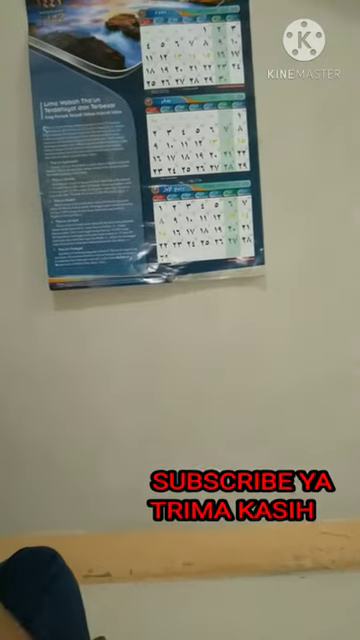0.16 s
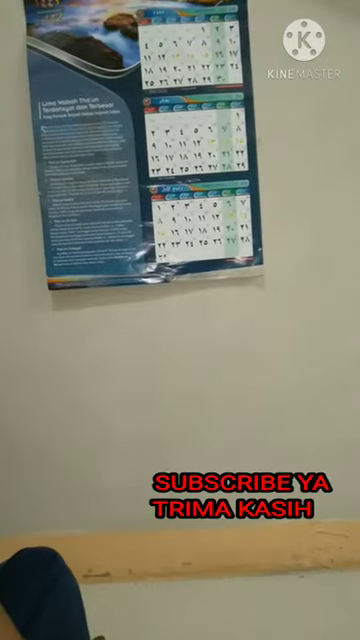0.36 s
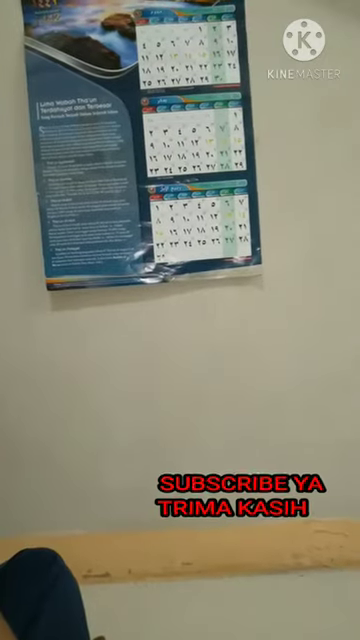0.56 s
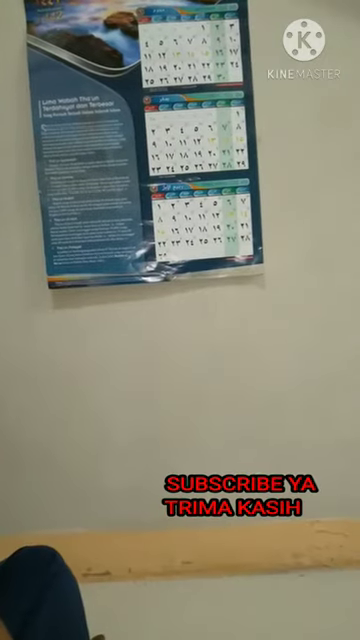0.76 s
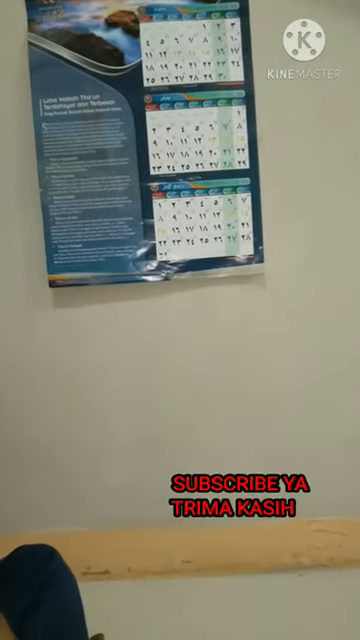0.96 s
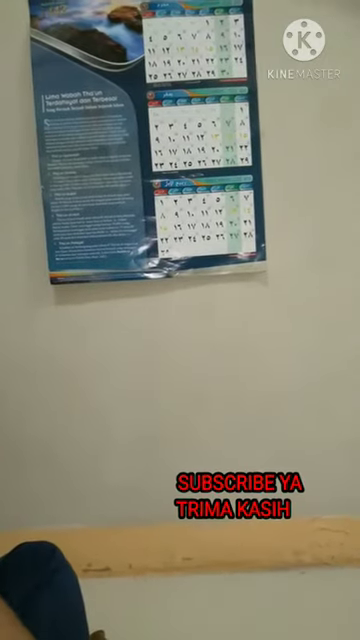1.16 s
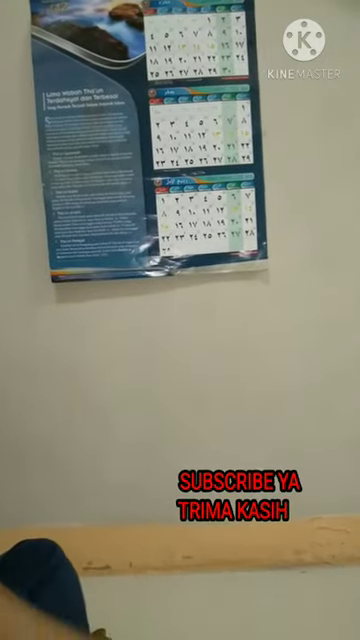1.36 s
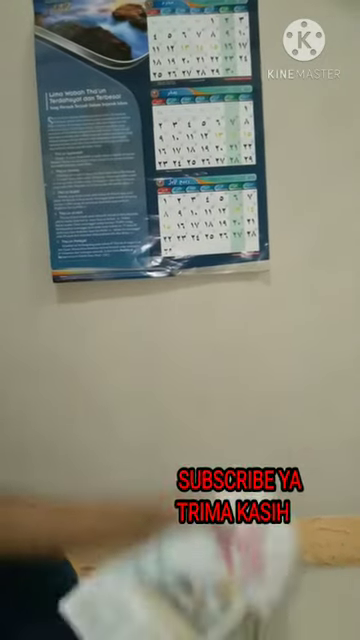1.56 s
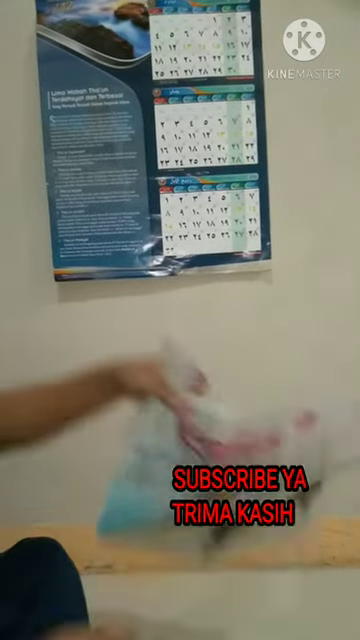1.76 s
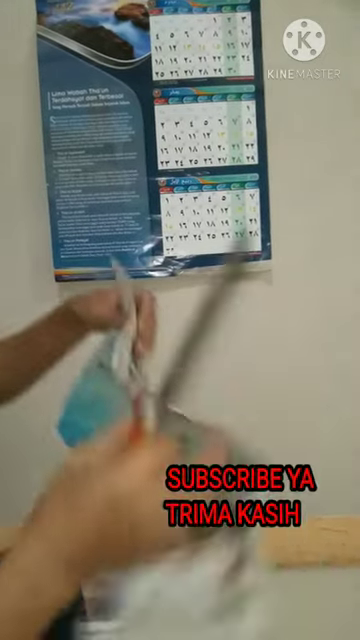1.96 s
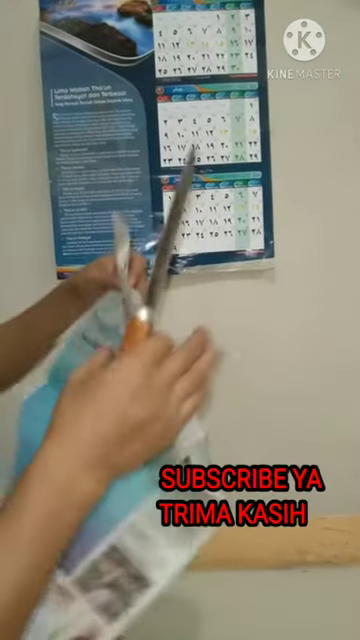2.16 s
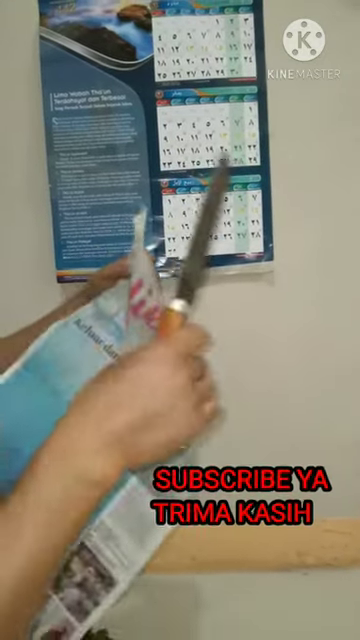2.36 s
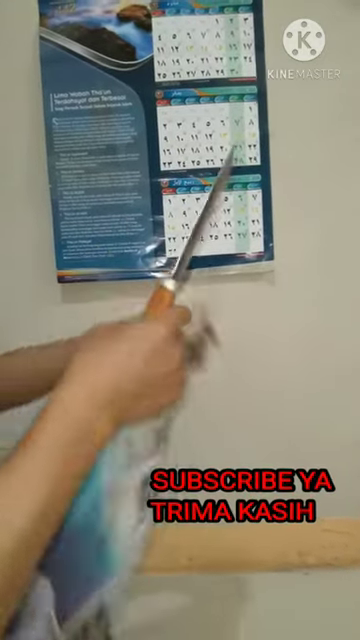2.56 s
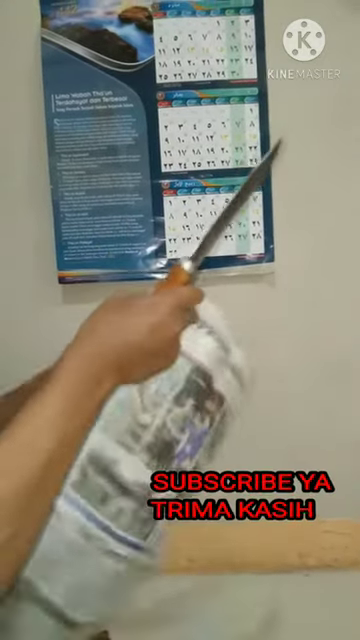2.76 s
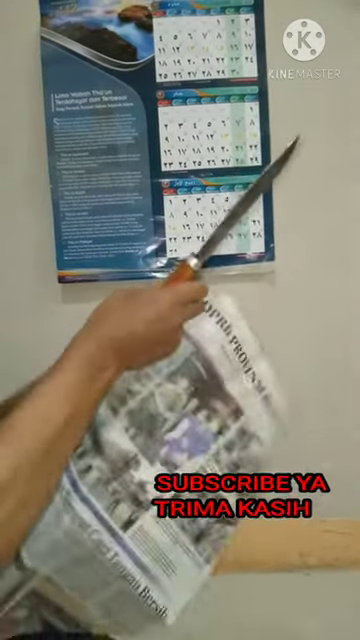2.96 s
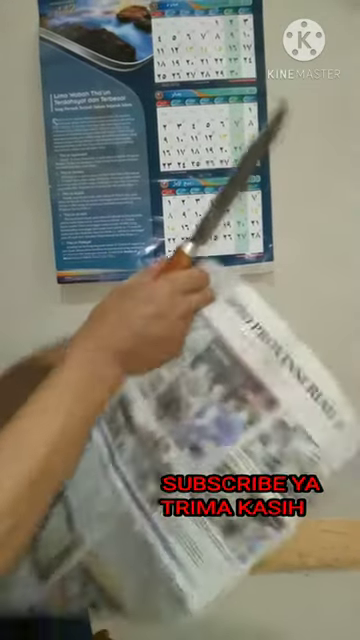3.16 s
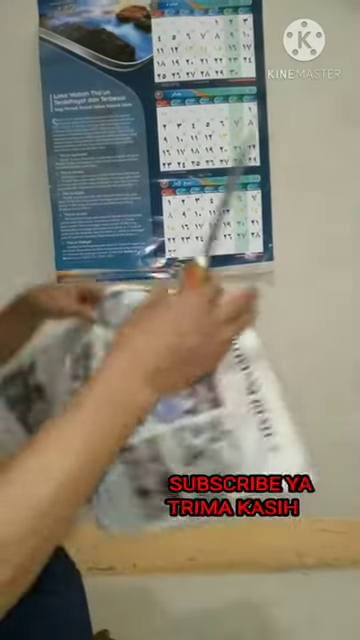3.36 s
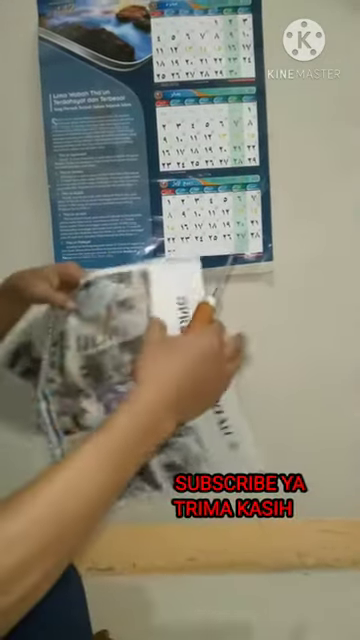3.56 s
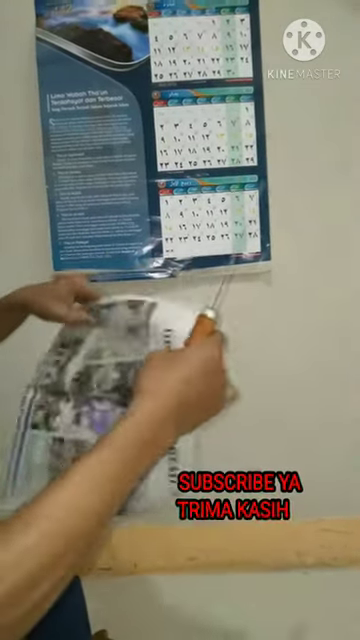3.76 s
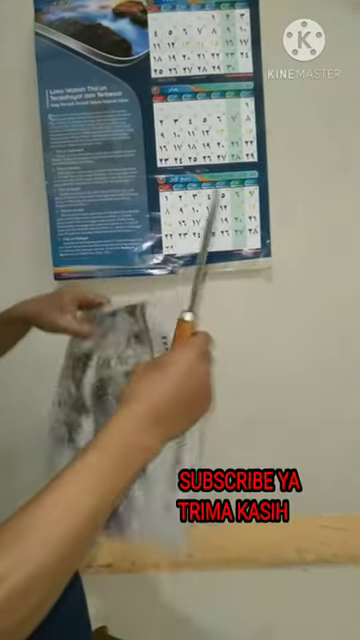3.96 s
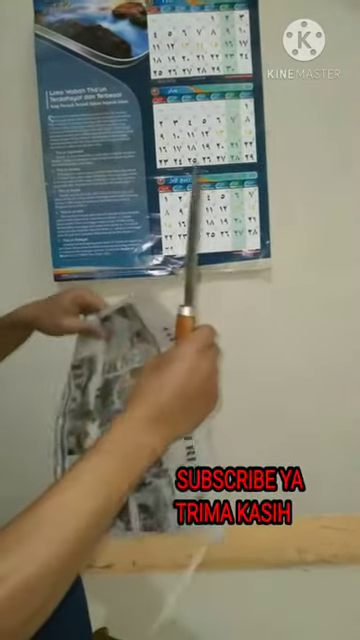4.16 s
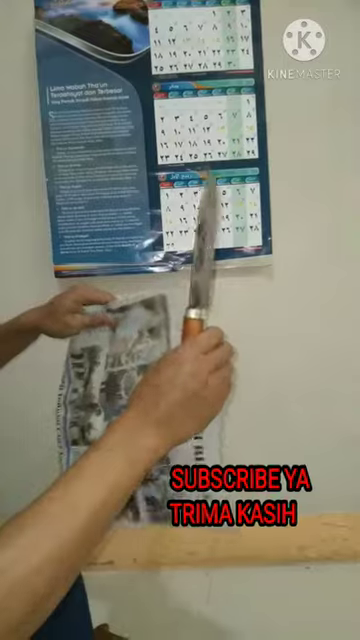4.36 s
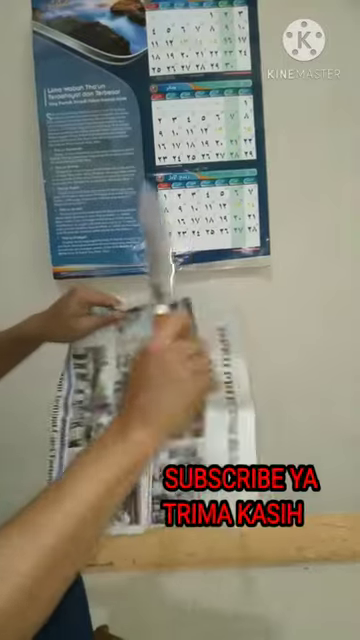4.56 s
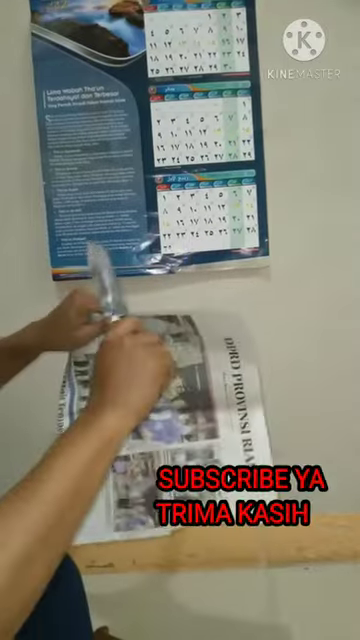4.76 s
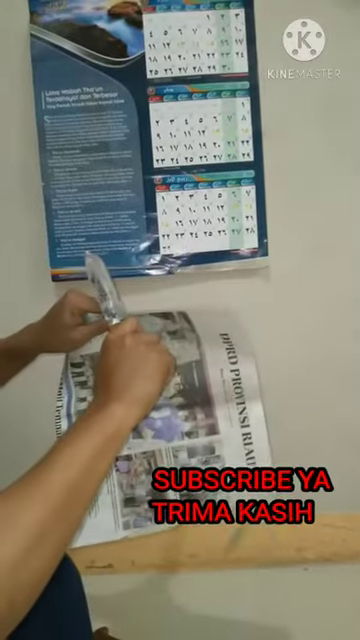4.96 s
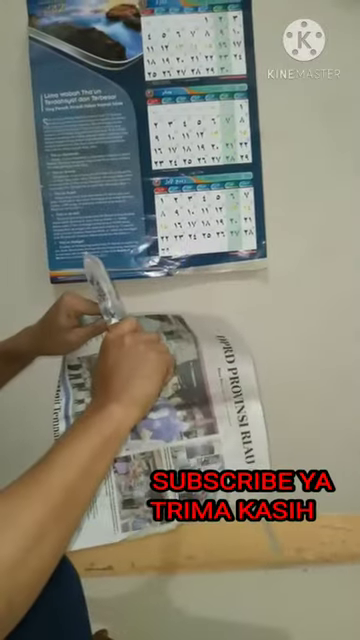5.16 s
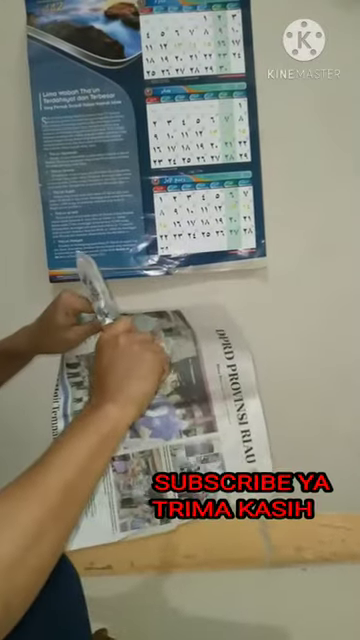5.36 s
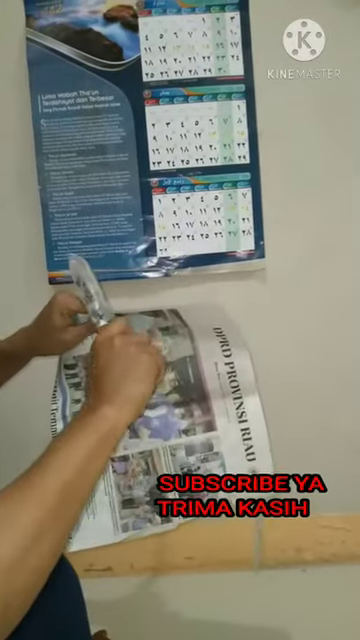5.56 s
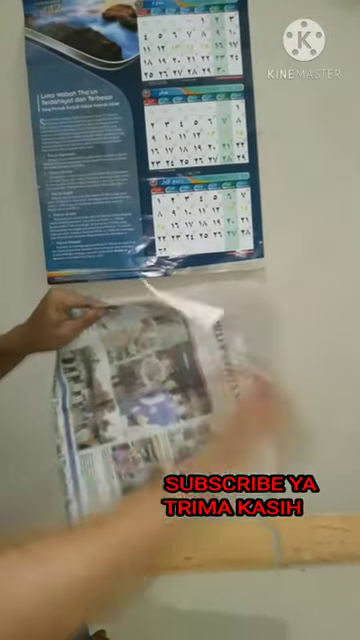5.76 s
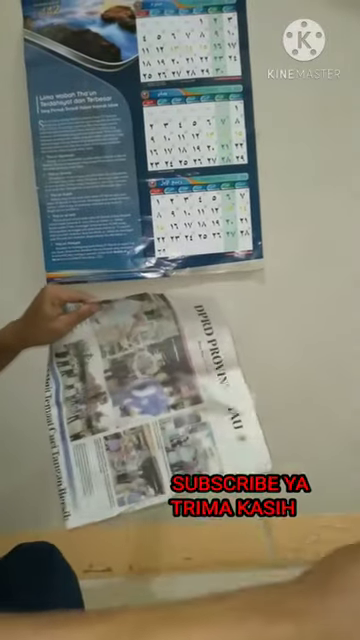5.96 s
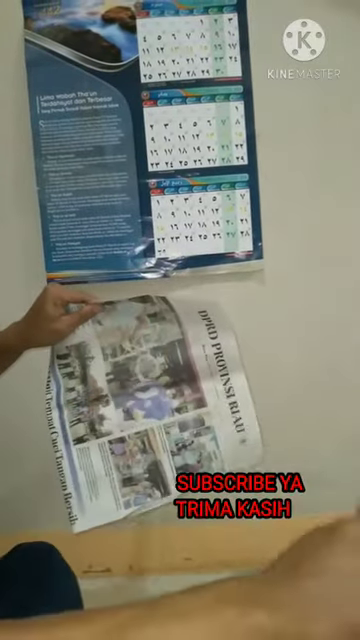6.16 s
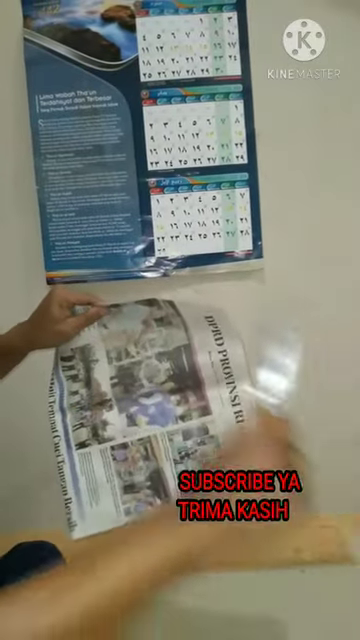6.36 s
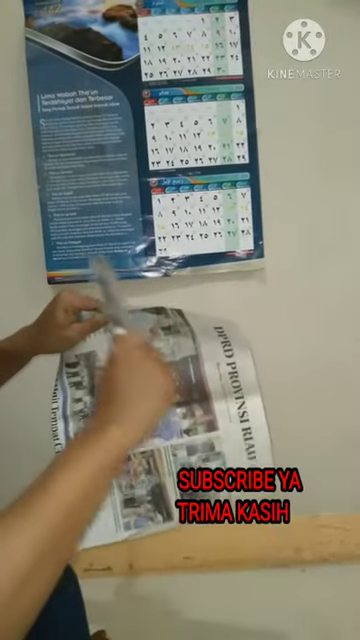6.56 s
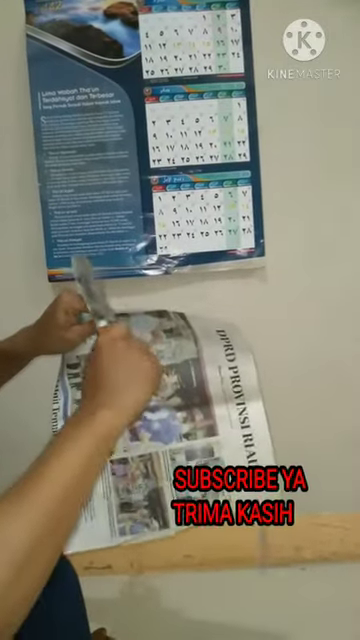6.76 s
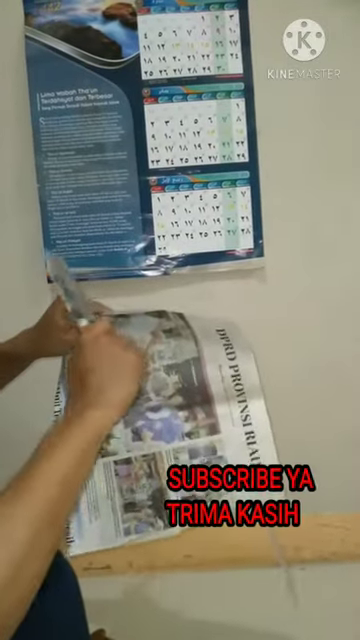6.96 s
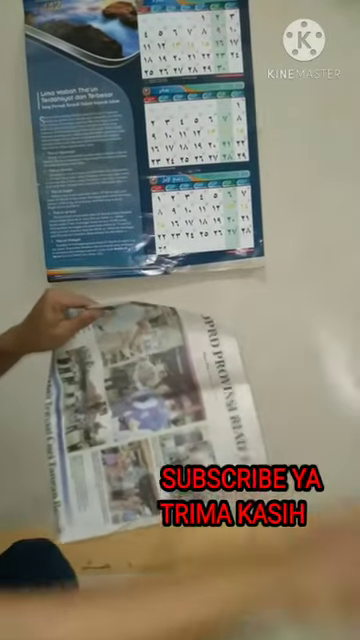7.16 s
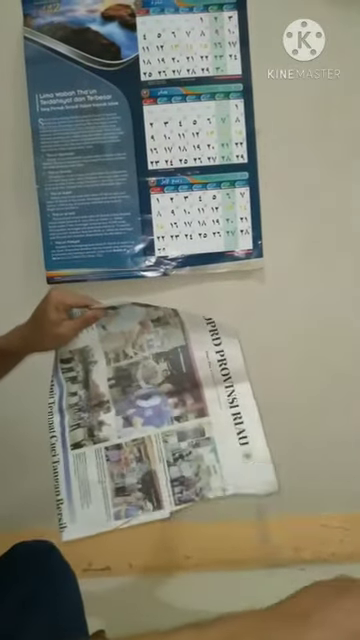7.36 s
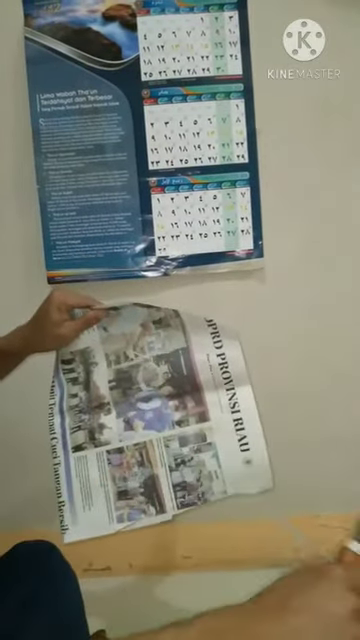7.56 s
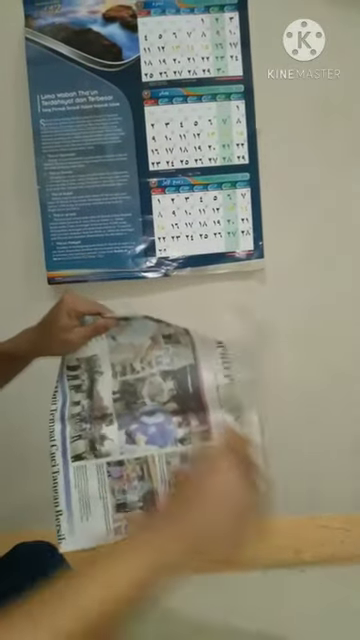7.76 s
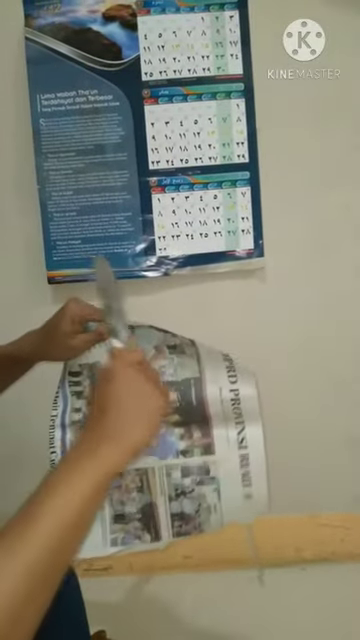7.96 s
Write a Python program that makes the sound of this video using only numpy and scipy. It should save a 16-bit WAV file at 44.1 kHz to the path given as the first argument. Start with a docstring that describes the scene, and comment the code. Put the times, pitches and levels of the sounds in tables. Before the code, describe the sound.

A sheet of newspaper crackles and flaps as it is handled in a hard-walled room, then a blade slices it twice with quick crisp rips.

```python
"""A sheet of newspaper is picked up, turned and held out in a bare, hard-walled room; a knife slashes it twice.
Paper and cuts are noise made of tiny random bursts, shaped by the effort of each move; snaps are single bursts.
The walls ring on as fading noise. Short swells, a low rumble and hiss lie around the paper.
A phone with two microphone ports hears it all, and its noise suppressor turns down whatever sinks
toward the background."""
import sys
import numpy as np
from scipy import signal
from scipy.fft import rfft, irfft, next_fast_len
from scipy.io import wavfile
from scipy.ndimage import uniform_filter1d

SR = 44100
rng = np.random.default_rng(int(sys.argv[2]) if len(sys.argv) > 2 else 0)


def pcm_store(signal):
    """Save signal as 16-bit PCM."""
    levels = np.round(np.clip(np.atleast_2d(signal), -1, 1) * 32767)
    wavfile.write(sys.argv[1], SR, levels.astype(np.int16).T)


N = 352490  # length of the scene in samples

# Colour of the whole paper as the ports hear it: pitch_hz [Hz], level_db [dB per Hz, relative]
SHEET_COLOUR = [(88, -58.5), (150, -30), (240, 0.5), (504, 3), (612, 3.5), (1450, -13), (2310, -8),
                (3220, -12), (4490, -13.5), (5360, -15.5), (8070, -10), (9820, -2), (11700, -14.5),
                (14800, -20), (16000, -32)]


def amp(db):
    """Turn a level in dB into a gain; 20 dB is a factor of ten."""
    return 10 ** (np.asarray(db) / 20)


def along(points, hz):
    """Read a curve of (pitch, value) points, with pitch on a log axis as the ear hears it."""
    point_hz, value = np.transpose(points)
    return np.interp(np.log(hz + 1), np.log(point_hz + 1), value)


def curves(rows):
    """Draw straight lines between timed points: one value per sample for each column after the time."""
    time_s, *columns = np.transpose(rows)
    return [np.interp(np.arange(N) / SR, time_s, column) for column in columns]


def filtered(x, response):
    """Colour a sound by multiplying each of its frequencies by response(hz)."""
    size = next_fast_len(x.shape[-1] + 8192)  # spare room keeps the end from wrapping to the start
    hz = np.fft.rfftfreq(size, 1 / SR)
    return irfft(rfft(x, size) * response(hz), size)[..., :x.shape[-1]]


def diffuse(n):
    """Sound from all around: two noises, alike in the bass and unrelated in the treble."""
    # Likeness of the sound at the two ports: pitch_hz [Hz], likeness [0 to 1]
    likeness = [(60, .82), (200, .75), (400, .55), (800, .2), (1400, 0)]

    def mid_and_side(hz):
        angle = np.arccos(np.clip(along(likeness, hz), -1, 1)) / 2
        return np.array([np.cos(angle), np.sin(angle)])

    mid, side = filtered(rng.standard_normal((2, n)), mid_and_side)
    return np.array([mid + side, mid - side])


def steady(spectrum, db):
    """Steady background: diffuse noise of one colour, set to a total level in dB."""
    noise = filtered(diffuse(N), lambda hz: amp(along(spectrum, hz)))
    return amp(db) * noise / np.std(noise)


def swells():
    """Short swells: noise in one narrow band under a soft rise and fall."""
    # The sheet billowing, or sounds from elsewhere in the house:
    # start_s [s], length_s [s], pitch_hz [Hz], width_hz [Hz], level_db [dB]
    swell_rows = [(.269, 0.082, 615, 53, -53.5), (.506, 0.1, 590, 190, -53.5), (.842, 0.15, 627, 83, -59),
                  (1.22, 0.19, 49.38, 9.5, -60.5), (1.517, 0.049, 317, 150, -44.5),
                  (1.93, 0.14, 2800, 550, -61), (2.151, .6, 2450, 720, -63.5),
                  (2.418, 0.052, 450, 370, -53.5), (2.766, .05, 500, 200, -58.5),
                  (3.02, .045, 405.7, 50, -53), (3.09, .07, 194.2, 33, -48), (3.665, 0.097, 173.4, 95, -55),
                  (3.76, 0.11, 236, 130, -49.5), (4.04, .11, 125, 42, -52), (4.104, .31, 251, 200, -62.5),
                  (5.129, 0.11, 2504, 540, -63), (5.14, 0.17, 5960, 1400, -65.5),
                  (5.24, .14, 364.4, 24, -66.5), (5.32, .19, 1600, 98, -74.5), (5.617, .1, 2657, 89, -65),
                  (5.98, .09, 505, 50, -59), (6.114, .08, 2150, 500, -64), (6.251, .058, 2747, 500, -64),
                  (6.54, .028, 194.3, 31, -54.5), (6.54, .053, 531.3, 200, -61),
                  (6.744, .04, 148.7, 120, -54.5), (6.865, .15, 5783, 3000, -64.5),
                  (7.6, 0.19, 483, 70, -63), (7.63, 0.076, 1256, 94, -67), (7.63, .16, 2660, 330, -68)]
    out = np.zeros(N + SR)
    for start_s, length_s, pitch_hz, width_hz, level_db in swell_rows:
        n = round(length_s * SR)
        start = round(start_s * SR)
        noise = rng.standard_normal(SR)
        band = filtered(noise, lambda hz: np.exp(-2 * ((hz - pitch_hz) / width_hz) ** 2))[:n]
        out[start:start + n] += amp(level_db) * np.sqrt(np.hanning(n)) * band / np.std(band)
    return out[:N]


def room(x):
    """Walls ring on: an echo of diffuse noise in which each frequency dies at its own speed."""
    # Ringing of the walls: pitch_hz [Hz], t60_s [s to fall by 60 dB]
    ringing = [(200, 1), (1400, .62), (4000, 0.62), (10000, 0.54), (12000, 0.59), (15000, 0.62)]
    hz, t, z = signal.stft(diffuse(SR), SR, nperseg=256)
    fade = amp(-60 * t / along(ringing, hz)[:, None])
    tail = signal.istft(z * fade, SR, nperseg=256)[1]
    tail = tail / np.linalg.norm(tail[0])
    delayed = np.pad(x, (200, 0))  # the echo starts 200 samples after the sound
    return signal.fftconvolve(delayed[None], tail, axes=1)[:, :N]


def ports(pair):
    """Sound reaches the farther port later; the lag changes as the sheet moves across."""
    # Movement of the sheet: time_s [s], left_lag [samples by which the left port hears it later]
    lag_rows = [(0, -14), (1.6, -14), (1.9, 5), (8, 5)]
    half_lag = curves(lag_rows)[0] / 2
    heard = []
    for side, sign in zip(pair, (1, -1)):
        source = np.arange(N) - np.round(sign * half_lag).astype(int)
        heard.append(side[np.clip(source, 0, N - 1)])
    return np.array(heard)


def spread(patches, share):
    """One patch reaches both ports alike, the other with opposite sign; long waves reach both alike."""
    # share is the power of the second patch, 0 to 1; its bass is weakened below about 700 Hz
    apart = filtered(patches[1], lambda hz: np.sqrt(share / (1 + (700 / (hz + 1)) ** 2)))
    return patches[0] * np.sqrt(max(1 - share, 0)) + apart * np.array([[1], [-1]])


def paper(pushes, spectrum):
    """Paper answers flap, crackle and crisp pushes, each in its own part of the colour with unit power."""
    # Borders between flap, crackle and crispness: edge_hz [Hz]
    edges_hz = (1500, 6000)

    def bands(hz):
        low, high = [1 / (1 + (hz / edge) ** 8) for edge in edges_hz]
        shapes = amp(along(spectrum, hz)) * np.sqrt([low, high - low, 1 - high])
        return shapes / np.sqrt(np.mean(shapes ** 2, axis=1, keepdims=True))

    return filtered(pushes, bands).sum(axis=0)


def crackle(effort, spectrum, rate, burst_s, spread_db, hiss):
    """Fibres let go in short bursts of uneven size over a smoother hiss; two patches of the sheet sound."""
    # rate is bursts per second; hiss is its power compared with the bursts
    happens = rng.random((2, N)) < rate / SR
    sizes = amp(spread_db * np.clip(rng.standard_normal((2, N)), -2, 2))
    bursts = signal.lfilter([1], [1, -np.exp(-1 / (burst_s * SR))], happens * sizes)  # each dies away
    envelope = np.sqrt(hiss + bursts ** 2 / np.mean(bursts ** 2)) / np.sqrt(1 + hiss)
    grain = envelope * rng.standard_normal((2, N))
    return np.array([paper(effort * patch, spectrum) for patch in grain])


def snaps():
    """Snaps: bursts of noise with a sharp crack and a softer tail, as both ports hear them."""
    # Creases buckling, fingers or blade touching: start_s [s], peak_db [dB], flap_db [dB from peak],
    # crisp_db [dB from peak], left_minus_right_db [dB]
    snap_rows = [(0.2647, -34.5, -19, 4.5, 3.5), (0.2695, -31, -15.5, -1.5, 2), (.4993, -25.5, -29, -4, -4),
                 (.5767, -39.5, -14, 18, 0.5), (0.7358, -30.5, -19, 11.5, -8.5),
                 (.823, -32.5, -2, 1.5, -4.5), (.8384, -27.5, -2, -2, -4.5), (.8462, -31, -10, 0, 0.5),
                 (0.8657, -24.5, -6, -1.5, -2.5), (.8894, -32.5, -25, 6, 1), (.9077, -32, -22, 3, 1.5),
                 (.932, -31, -17.5, -9, 1), (1.294, -39, -19, -6.5, 9), (1.5273, -28.5, -26, -10.5, 15.5),
                 (1.6871, -42.5, -11, -31.5, 18), (1.7294, -46.5, -14.5, 0, 2.5),
                 (2.1281, -41.5, -22.5, -41, 8.5), (2.573, -42.5, -37.5, -23, -3),
                 (2.6584, -47.5, -23, 4, 8.5), (3.0277, -35, -5.5, -41.5, 16), (3.047, -28, -21, -27, -6),
                 (3.1966, -26.5, -9.5, -13.5, 17), (3.5618, -58.5, -8.5, 22, 4),
                 (3.6502, -45.5, -18.5, 3.5, 10.5), (3.68, -36.5, -17, -17.5, 23),
                 (3.7496, -27, -12.5, -1.5, 5), (3.7709, -37.5, -37.5, -5.5, 12),
                 (3.7801, -27, -14.5, -3, 1.5), (3.7962, -16, -20.5, 7.5, 4.5), (3.7988, -16, -29.5, 3, 10),
                 (3.9429, -31.5, -28, 3.5, 14.5), (4.0218, -35, -20.5, 2.5, 8),
                 (4.1106, -29.5, -26, -5, 10), (4.3161, -34, -34.5, -9, 4), (4.6374, -39, -9.5, -13, -2.5),
                 (4.781, -62, -18.5, 30, -15.5), (4.7958, -62.5, -14, 22.5, 4.5), (4.891, -60, -10, -15, 0),
                 (5.9894, -42.5, -16, 15.5, -2.5), (6.2692, -54, -22, -2, 18.5),
                 (6.3999, -61, -12.5, 22, 7.5), (6.7787, -59, 10.5, -18, 15.5),
                 (7.2768, -36.5, -26.5, 14.5, 10), (7.4111, -32.5, -29, 6, 3.5),
                 (7.7582, -56.5, 3, -15, 8.5), (7.8596, -63, -24, 30.5, -7)]
    crack_t60_s, tail_size, tail_t60_s = .0085, .15, .05  # t60: seconds to fall by 60 dB
    pushes = np.zeros((2, 3, N + SR))
    t = np.arange(SR // 20) / SR
    decay = amp(-60 * t / crack_t60_s) + tail_size * amp(-60 * t / tail_t60_s)
    for start_s, peak_db, flap_db, crisp_db, left_minus_right_db in snap_rows:
        # noise peaks stand a few dB over its envelope
        burst = amp(peak_db - 6.0) * decay * rng.standard_normal(len(t))
        band_sizes = amp([flap_db, 0, crisp_db])[:, None]
        port_sizes = amp([left_minus_right_db / 2, -left_minus_right_db / 2])[:, None, None]
        start = round(start_s * SR)
        pushes[..., start:start + len(t)] += band_sizes * port_sizes * burst
    return np.array([paper(side[:, :N], SHEET_COLOUR) for side in pushes])


def slashing():
    """Effort of the cuts: the blade bites, runs through and leaves; the cut edge flutters, then rests."""
    # Blade tearing through fibres: start_s [s], cut_s [s], entry_db [dB], exit_db [dB], flutter_s [s],
    # flutter_db [dB], flap_db [dB from crackle], crisp_db [dB from crackle]
    slash_rows = [(5.733, 0.018, -34.5, -20, .045, -31.5, -10, 8.5),
                  (7.088, .04, -31, -24, .02, -35.5, -8, 15)]
    bite_s, leave_s, settle_s = 0.0026, 0.0028, .04  # blade entering, leaving, edge coming to rest
    effort = np.zeros((3, N))
    t = np.arange(N) / SR
    for start_s, cut_s, entry_db, exit_db, flutter_s, flutter_db, flap_db, crisp_db in slash_rows:
        times = start_s + np.cumsum([-bite_s, bite_s, cut_s, leave_s, flutter_s, settle_s])
        levels = [entry_db - 26.5, entry_db, exit_db, flutter_db, flutter_db - 1, flutter_db - 62.5]
        level_db = np.interp(t, times, levels, -200, -200)  # as good as silent outside the cut
        effort += amp(level_db + np.array([[flap_db], [0], [crisp_db]]))
    return effort


def moving():
    """Effort of handling the sheet: each movement climbs to its peak and sinks away; their powers add."""
    # Movements of the sheet: peak_s [s], rise_s [s], fall_s [s], crackle_db [dB],
    # flap_db [dB from crackle], crisp_db [dB from crackle]
    move_rows = [(.14, 0.64, 0.58, -57.5, -2.5, -5.5), (.272, 0.0071, 0.072, -40, -4.5, 4.5),
                 (0.294, .03, 0.17, -44, -4, 3.5), (.509, 0.073, 0.16, -44.5, -1.5, 9.5),
                 (0.688, 0.078, .3, -47, -4, 11), (0.882, 0.14, .3, -40, -6.5, 5.5),
                 (1.01, .2, .25, -47.5, -9.5, 6.5), (1.201, .3, 0.41, -51.5, -7, 5),
                 (1.295, 0.0076, 0.11, -40.5, -9, 3), (1.49, 0.12, 0.22, -51.5, -3.5, 4.5),
                 (1.529, 0.013, 0.062, -40, -11, 6.5), (1.73, 0.077, 0.1, -50, -6, -0.5),
                 (1.99, .2, .15, -61, -4.5, 0), (2.133, 0.014, 0.13, -48, -8, -11),
                 (2.24, 0.17, 0.24, -59.5, -1, -12), (2.359, 0.14, 0.22, -50.5, -10.5, 6),
                 (2.43, 0.11, 0.046, -59.5, -11.5, 16.5), (2.568, 0.014, 0.23, -52, -11, -7),
                 (2.659, 0.026, 0.082, -49, -15, 7.5), (2.771, .2, .2, -56, -0.5, -7.5),
                 (2.878, 0.025, 0.076, -51.5, -18, -0.5), (3.03, .006, .12, -32, -12, -16),
                 (3.09, 0.072, .08, -46.5, -10.5, 8.5), (3.148, .08, 0.062, -46.5, -4, 10.5),
                 (3.2, .02, 0.073, -50, -0.5, -3), (3.565, .02, 0.2, -57.5, -1.5, 9),
                 (3.651, 0.0073, 0.17, -51.5, -1.5, 3.5), (3.682, 0.017, 0.069, -44.5, -1.5, 3),
                 (3.774, 0.015, 0.097, -33, -8.5, -2.5), (3.824, .05, .1, -46.5, -7.5, 5.5),
                 (3.961, 0.064, 0.052, -42.5, -12, 5), (4.07, 0.082, 0.19, -45, -2.5, -2.5),
                 (4.18, 0.089, .15, -39.5, -24.5, 3.5), (4.33, 0.086, 0.31, -53, -20.5, 10),
                 (4.429, 0.18, 0.072, -56.5, -8.5, 13.5), (4.648, .13, .055, -64.5, -3, -5.5),
                 (4.794, 0.017, .07, -68, -4.5, 24.5), (5.139, 0.0096, 0.12, -54, -6, -1.5),
                 (6.166, 0.078, 0.054, -60, 0, -32), (6.271, .016, 0.061, -62.5, -9.5, 7.5),
                 (6.774, .03, .05, -74.5, 10, -10.5), (6.405, 0.0066, .12, -74.5, -14.5, 12.5),
                 (7.015, .03, 0.22, -63, -19.5, 9), (7.66, .1, 0.25, -67.5, 4, -4)]
    span_db = 20  # climb in one rise time, and drop in one fall time
    power = np.zeros((3, N))
    t = np.arange(N) / SR
    for peak_s, rise_s, fall_s, crackle_db, flap_db, crisp_db in move_rows:
        rise_s, fall_s = np.maximum([rise_s, fall_s], 1 / 500)
        first = max(int((peak_s - 2 * rise_s) * SR), 0)
        span = slice(first, int((peak_s + 2 * fall_s) * SR))
        away = np.maximum((peak_s - t[span]) / rise_s, (t[span] - peak_s) / fall_s)
        band_power = amp(2 * np.array([[flap_db], [0], [crisp_db]]))  # twice the dB gives power
        power[:, span] += amp(2 * (crackle_db - span_db * away)) * band_power
    return np.sqrt(power)


def mottled(x, depth_db):
    """As the folds change, small regions of pitch swell and fade for a moment."""
    z = signal.stft(x, nperseg=256)[2]
    field = rng.standard_normal(z.shape[1:])
    field = uniform_filter1d(field, size=4, axis=0)  # smooth over pitch
    field = uniform_filter1d(field, size=12, axis=1)  # smooth over time
    gain = amp(depth_db * field / np.std(field))
    return signal.istft(z * gain, nperseg=256)[1][:, :N]


def scene():
    """Add sheet, cuts, snaps and swells, let the room answer, then add the background."""
    # Background of the house: pitch_hz [Hz], level_db [dB per Hz, relative]
    rumble_colour = [(15, -57), (35, -22), (55, 0), (66, -2), (86, -10.5), (100, -1.5), (126, 0.5),
                     (145, -14), (215, -12), (300, -23), (500, -31.5), (900, -48), (1500, -120)]
    # Room and microphone hiss: pitch_hz [Hz], level_db [dB per Hz, relative]
    hiss_colour = [(100, -36.5), (400, -3), (1000, -10), (2500, -9), (3500, -10), (6000, -15),
                   (8000, -10.5), (9500, -4.5), (11500, -12.5), (16000, -21)]
    # Colour of the cut as the ports hear it: pitch_hz [Hz], level_db [dB per Hz, relative]
    torn_colour = [(90, -57), (160, -17.5), (400, -12), (1000, -14.5), (1500, -16.5), (2100, -11.5),
                   (2600, -3), (3200, -14.5), (4400, -11.5), (5700, -15.5), (7500, -15), (9500, -3),
                   (11500, -14), (14500, -26), (16000, -33)]
    # Balance of the two ports: pitch_hz [Hz], left_minus_right_db [dB]
    balance = [(60, -10), (99, 4.5), (160, -9), (270, 5), (450, -1), (740, 3), (1220, 4.5), (2010, 4.5),
               (3330, 6.5), (5500, 4.5), (9080, 3.5), (15000, -3.5)]
    rustle = crackle(moving(), SHEET_COLOUR, rate=250, burst_s=0.001, spread_db=2.5, hiss=1.0)
    handling = spread(mottled(rustle, depth_db=2.63), share=0.48)
    tearing = crackle(slashing(), torn_colour, rate=1200, burst_s=0.00025, spread_db=11, hiss=1.0)
    cuts = spread(tearing, share=0.65)
    near = ports(handling + cuts + snaps()) + swells()
    heard = near + amp(-5.5) * room(near[0])
    leaning = filtered(heard, lambda hz: amp(along(balance, hz) * np.array([[.5], [-.5]])))
    return leaning + steady(rumble_colour, db=-55) + steady(hiss_colour, db=-61)


def suppress(x, knee_db, slope, depth_db):
    """Noise suppressor: each band is turned down as it sinks toward its own quiet level; it opens at once."""
    z = signal.stft(x, nperseg=256)[2]
    now = uniform_filter1d(np.mean(np.abs(z) ** 2, axis=0), size=5, axis=0)
    recent = uniform_filter1d(now, size=9, axis=1, origin=4)  # average over this and earlier moments
    level_db = 10 * np.log10(np.abs(np.maximum(.5 * now, recent)) + 1e-20)
    quiet_db = np.percentile(level_db, 10, axis=1, keepdims=True)
    over_db = level_db - quiet_db
    gain = amp(np.clip(slope * (over_db - knee_db), -depth_db, 0))
    return signal.istft(z * gain, nperseg=256)[1][:, :N]


def record(dry):
    """The phone: noise suppressor, a soft overload near full scale, then an upper limit on pitch."""
    top_hz = 15700
    quiet = suppress(dry, knee_db=18.5, slope=0.99, depth_db=35.5)
    rounded = quiet / (1 + np.abs(quiet / .9) ** 4) ** .25
    return filtered(rounded, lambda hz: hz < top_hz)


dry = scene()
out = record(dry)
pcm_store(out)
```